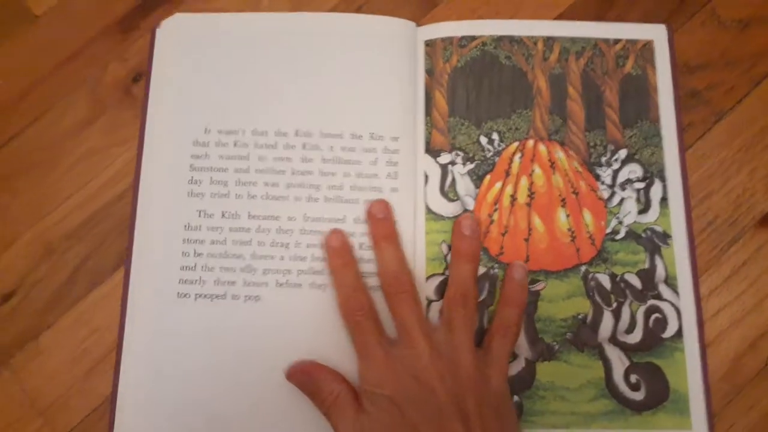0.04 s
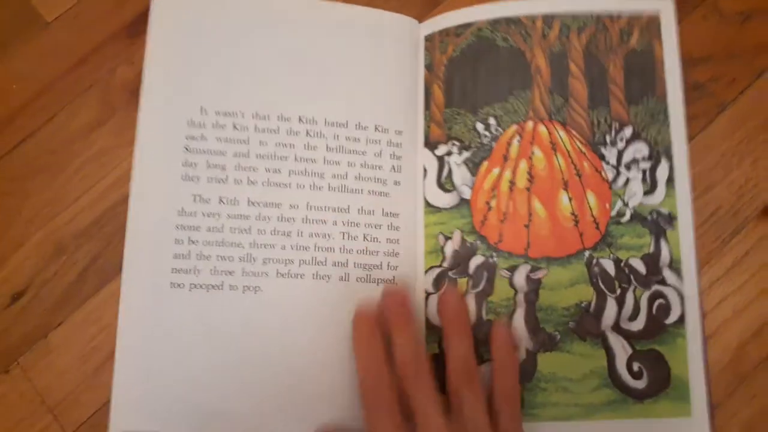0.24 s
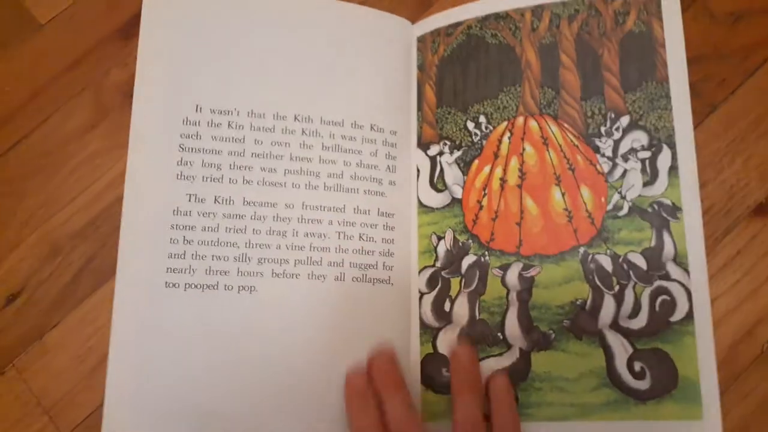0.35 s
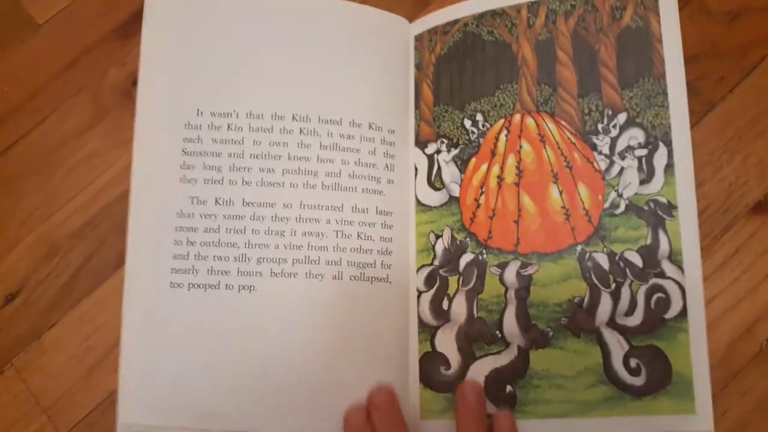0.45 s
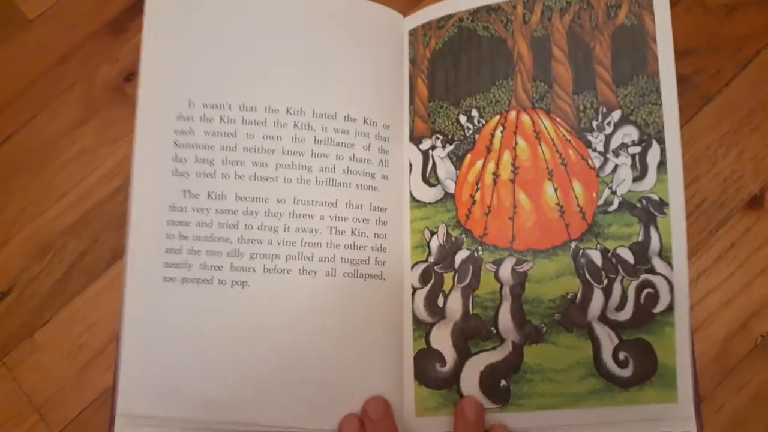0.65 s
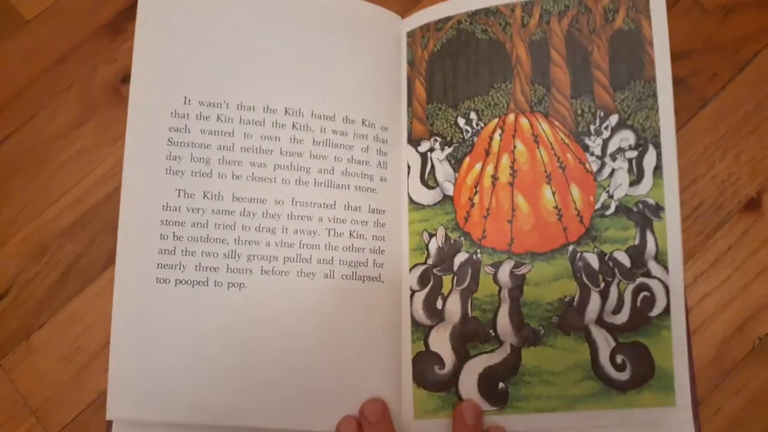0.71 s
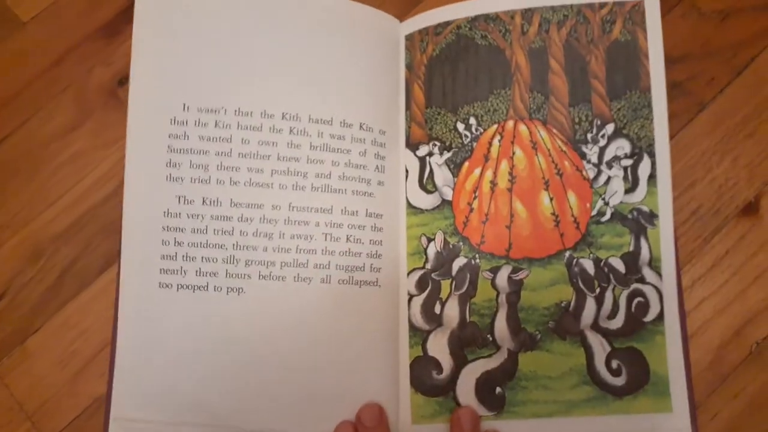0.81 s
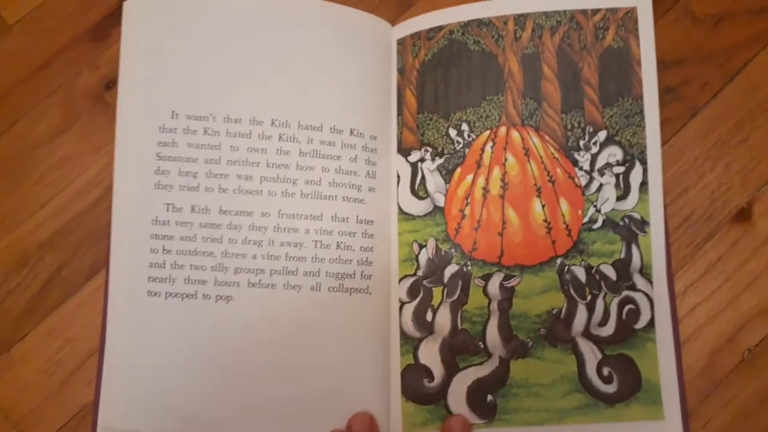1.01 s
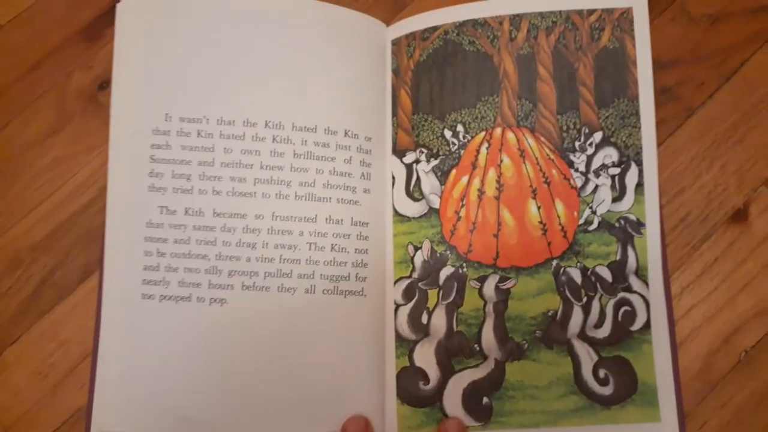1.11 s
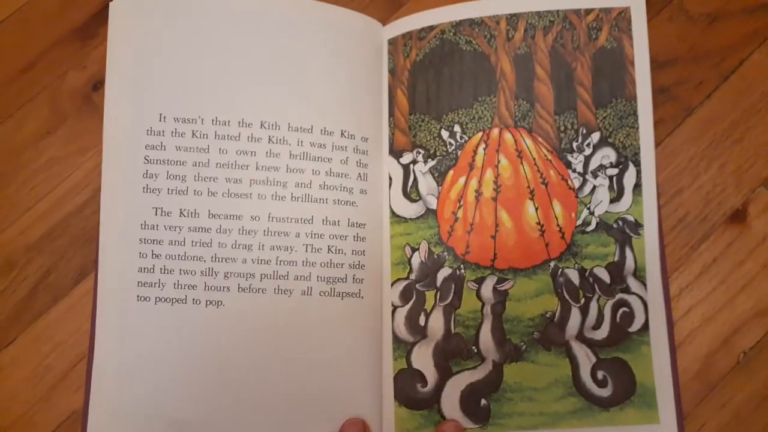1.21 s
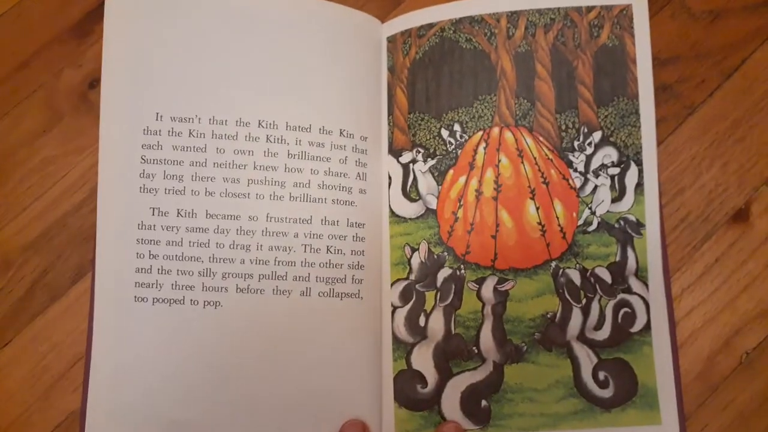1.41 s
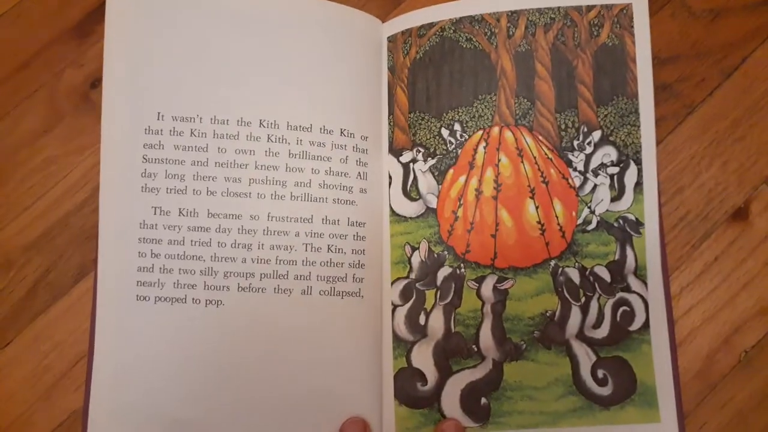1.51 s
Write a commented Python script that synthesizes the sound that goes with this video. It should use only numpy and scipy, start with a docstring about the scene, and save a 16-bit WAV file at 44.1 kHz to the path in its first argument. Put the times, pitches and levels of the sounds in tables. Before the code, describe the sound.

A hand slides down open book pages, close and right-sided: a soft rustle from the start, a dry hiss swelling to about 0.3 s and fading by 0.65. The book knocks on floorboards, hardest at 0.24 s with a papery clap, again near 0.32 and 0.37. Faint left ticks begin at 0.53; a soft low thud lands at 0.8. Steady machine hum and room hiss continue to about 1.5 s.

```python
"""A quiet room with a wooden floor: a machine hums as steady sines over room tone and microphone hiss.
Close to the right microphone a hand slides down the pages of an open book: dense clicks hiss and rustle.
From early on the book knocks on the boards, hardest near 0.24 s: struck modes ring, with a clap of pages.
From 0.53 s the binding ticks faintly on the left, short rings of small modes.
At 0.8 s comes a soft low thud, also nearer the left, made of low modes."""
import sys
import numpy as np
from scipy import signal
from scipy.fft import rfft, irfft
from scipy.io import wavfile

SR = 44100
rng = np.random.default_rng(int(sys.argv[2]) if len(sys.argv) > 2 else 0)


def int16_out(signal):
    """Quantize to a 16-bit WAV file."""
    q = np.round(np.clip(np.atleast_2d(signal).T, -1, 1) * 32767)
    wavfile.write(sys.argv[1], SR, q.astype(np.int16))


def how_loud(loudness_db):
    """Turn decibels into a plain amplitude multiplier (0 dB gives 1, 20 dB gives 10)."""
    steps = np.asarray(loudness_db, float) / 20
    return 10 ** steps


N = 68355  # length in samples

# Balance of the background between the microphones. Each row: frequency in Hz, left minus right in dB.
AIR_BALANCE = [(60, .6), (110, 0), (200, -5), (380, -5), (700, -4.5), (1290, -9), (2380, -2.5),
               (4400, -1.5), (15000, 0)]
# The book touches the boards. Each row: start in seconds, level in dB, cut of the soft contact in Hz,
# ring time under the hand as a multiple of the free ring time.
KNOCKS = [(.0560, -45, 2600, 0.51), (0.16, -43, 790, 1.2), (.1990, -40, 814, .5),
          (.2300, -22.5, 1500, 1.36), (0.2374, -14.5, 2500, 1.11), (0.2431, -32.5, 1270, 1),
          (0.2565, -42, 2000, 0.3), (0.3164, -24, 1800, .9), (.3203, -29, 1300, 0.37),
          (.3690, -35, 1260, 0.2), (0.3763, -42.5, 1280, 1), (0.678, -49.5, 905, 0.43)]
# How alike the hand's sound is at both microphones. Each row: frequency in Hz, likeness from 0 to 1.
SLIDE_LIKENESS = [(1200, 0.26), (4000, 0.067), (15000, 0.14)]


def rms_one(x):
    """Scale to rms 1."""
    return x / np.sqrt(np.mean(x ** 2) + 1e-20)


def at_hz(points, hz):
    """Read a table on a log-frequency axis."""
    table = np.array(points)
    return np.interp(np.log(hz), np.log(table[:, 0]), table[:, 1])


def drift(rate_hz):
    """Slow random wandering of spread 1: noise through two equal low-pass poles."""
    hop = 40  # samples between slow values
    pole = np.exp(-2 * np.pi * rate_hz * hop / SR)
    noise = rng.standard_normal(N // hop + 2002)
    slow = signal.lfilter([1], [1, -2 * pole, pole * pole], noise)[2000:]  # settled part
    return np.interp(np.arange(N) / hop, np.arange(len(slow)), rms_one(slow - slow.mean()))


def ring(clicks, hz, t60):
    """A two-pole resonator: a unit click sets a sine of height 1 ringing, down 60 dB after t60 s."""
    r = how_loud(-60 / (t60 * SR))
    w = 2 * np.pi * hz / SR
    return signal.lfilter([0, np.sin(w)], [1, -2 * r * np.cos(w), r * r], clicks + 1e-18)


def sides(balance_db):
    """Left and right gains around the middle, from left minus right in dB."""
    return how_loud(np.array([[.5], [-.5]]) * balance_db)


def coloured(source, spectrum, balance, likeness):
    """Mix two unrelated sources to a pair with given colour, balance and likeness; mid rms 1."""
    hz = np.maximum(np.fft.rfftfreq(N, 1 / SR), 1)
    inside = (hz >= spectrum[0][0]) & (hz <= spectrum[-1][0])
    mid, side = rfft(source)
    alike = np.clip(at_hz(likeness, hz), -1, 1)
    pair = np.sqrt(1 + alike) * mid + np.sqrt(1 - alike) * side * np.array([[1], [-1]])
    colour = how_loud(at_hz(spectrum, hz)) * inside
    out = irfft(pair * colour * sides(at_hz(balance, hz)), N)
    return out / np.sqrt(np.mean(out.mean(axis=0) ** 2))


def grains():
    """Two unrelated streams of dense uneven clicks."""
    grains_per_s, spread_db = 12000, 1.2
    present = rng.random((2, N)) < grains_per_s / SR
    heights = rng.standard_normal((2, N)) * how_loud(spread_db * rng.exponential(1, (2, N)))
    return present * heights


def strike(events, modes, spread_db):
    """Each event strikes every mode with a strength of its own; one row of sound per mode."""
    luck = rng.standard_normal((len(events), len(modes)))
    rows = np.zeros((len(modes), N))
    for (s, db, *contact), chances in zip(events, luck):
        start = int(s * SR)
        click = np.zeros(min(N - start, SR // 4))  # each ring is cut after a quarter second
        click[0] = how_loud(db)
        cut_hz, share = contact or (SR, 1)
        for row, (hz, level_db, t60, *_), chance in zip(rows, modes, chances):
            softness = 1 + (hz / cut_hz) ** 3  # a soft contact stirs high modes less
            gain = how_loud(level_db + spread_db * chance) / softness
            row[start:start + len(click)] += ring(click, hz, t60 * share) * gain
    return rows


def room_tone():
    """Room tone and microphone hiss: steady noise, most alike at both microphones in the bass."""
    # Colour of the background. Each row: frequency in Hz, level in dB per Hz (relative).
    air_colour = [(20, -36), (37, -17), (60, -28), (90, -9.5), (125, -8.5), (200, -16), (300, -8.5),
                  (390, -17.5), (520, -21.5), (640, -17), (1050, -20.5), (1300, -28), (1700, -33.5),
                  (2200, -35), (3000, -42.5), (4000, -42.5), (7000, -51), (9000, -52.5), (12000, -45),
                  (16000, -46.5)]
    # Each row: frequency in Hz, left-right likeness from 0 to 1.
    air_likeness = [(60, .9), (130, .85), (290, .8), (640, .55), (1410, .05), (15000, 0)]
    level_db = -61  # rms of the mid
    return how_loud(level_db) * coloured(rng.standard_normal((2, N)), air_colour, AIR_BALANCE, air_likeness)


def hum():
    """Steady machine tones: sines of constant level, each with a random phase."""
    # Tones of the machine. Each row: frequency in Hz, rms level in dB midway between the sides.
    hum_tones = [(61, -72), (86, -66), (103.4, -58), (207, -70), (276, -72), (317, -68), (414, -78),
                 (625, -80), (1017.5, -75)]
    t = np.arange(N) / SR
    total = np.zeros((2, N))
    for hz, db in hum_tones:
        tone = np.sqrt(2) * how_loud(db) * np.sin(2 * np.pi * (hz * t + rng.random()))
        total += tone * sides(at_hz(AIR_BALANCE, hz))
    return total


def room(x):
    """Dense reflections: noise that dies band by band, partly alike in both channels."""
    # Decay of the room. Each row: frequency in Hz, time to fall 60 dB in seconds.
    room_t60 = [(200, 1), (600, 0.2), (1200, 0.26), (3000, 0.3), (8000, 0.15)]
    gain_db, balance_db, delay_s = -12.5, -5.5, 0.003
    low_cut_hz, likeness = 450, .55
    t = np.arange(SR // 2) / SR
    tail = np.zeros((2, len(t)))
    limits_hz = 100 * 2 ** np.arange(0, 7.1, .5)  # half octaves
    for low, high in zip(limits_hz, limits_hz[1:]):
        sos = signal.butter(2, [low, high], "band", fs=SR, output="sos")
        band = signal.sosfilt(sos, rng.standard_normal((2, len(t))))
        tail += band * how_loud(-60 * t / at_hz(room_t60, np.sqrt(low * high)))
    mid, side = tail
    tail = np.sqrt(1 + likeness) * mid + np.sqrt(1 - likeness) * side * [[1], [-1]]
    tail = tail * (t > delay_s)
    tail = tail / np.sqrt(np.sum(tail ** 2, axis=1, keepdims=True) * .5)  # energy 2 in each channel
    high_pass = signal.butter(2, low_cut_hz, "high", fs=SR, output="sos")
    sent = signal.sosfilt(high_pass, x.mean(axis=0))
    return how_loud(gain_db) * sides(balance_db) * signal.fftconvolve(sent[None], tail, axes=1)[:, :N]


def thud():
    """A soft low thud nearer the left: a click rings a few low modes."""
    # Each row: start in seconds, level in dB.
    thud_events = [(.804, -42.5)]
    # Each row: frequency in Hz, level in dB, time to fall 60 dB in seconds.
    thud_modes = [(160, -3, .07), (230, -2, .06), (380, -8, .04)]
    right_db = -8
    left = strike(thud_events, thud_modes, 0.67).sum(axis=0)
    return np.array([left, how_loud(right_db) * left])


def binding_ticks():
    """Faint ticks of the binding on the left: clicks ring small, quickly dying modes."""
    # Each row: start in seconds, level in dB.
    tick_events = [(.528, -67), (.534, -72), (.541, -69), (.572, -71), (.674, -74), (.690, -74),
                   (.777, -88), (.879, -75), (1.186, -78), (1.202, -74), (1.288, -74), (1.304, -72),
                   (1.330, -74), (1.391, -74), (1.458, -73), (1.464, -72), (1.470, -74.5), (1.493, -73),
                   (1.498, -67.5), (1.526, -70), (1.531, -68), (1.547, -78)]
    # Each row: frequency in Hz, level in dB, time to fall 60 dB in seconds.
    tick_modes = [(2300, 6.5, 0.011), (3420, 8.5, 0.0041), (5660, -14, 0.0077)]
    right_db = -18
    left = strike(tick_events, tick_modes, 3.5).sum(axis=0)
    return np.array([left, how_loud(right_db) * left])


def floor_boards():
    """Each knock also sets the floor's low mode ringing, stronger at the right microphone."""
    # Each row: frequency in Hz, level in dB, free time to fall 60 dB in seconds.
    board_modes = [(187.7, -27.5, .2)]
    return strike(KNOCKS, board_modes, 1.0) * sides(-9.0)


def page_clap():
    """Pages clap with each knock: band-passed noise that dies exponentially, more for hard contacts."""
    level_db, t60_s, balance_db = -20, 0.083, -7.5
    low_hz, high_hz = 1360, 3270
    force = np.zeros(N)
    for s, db, cut_hz, _ in KNOCKS:
        force[int(s * SR)] = how_loud(db + level_db) * (cut_hz / low_hz) ** 2
    envelope = signal.lfilter([1], [1, -how_loud(-60 / (t60_s * SR))], force)
    sos = signal.butter(2, [low_hz, high_hz], "band", fs=SR, output="sos")
    return signal.sosfilt(sos, envelope * rng.standard_normal((2, N))) * sides(balance_db)


def book_knocks():
    """The book's edge meets the floor and modes ring; the left microphone hears it a little later."""
    # Modes of book and boards, ahead of the band filter. Each row: frequency in Hz, level in dB,
    # free time to fall 60 dB in seconds, left minus right in dB.
    book_modes = [(435, -14, .07, -1), (500, -18, .06, -2), (590, -21, .05, -3), (675, -16, .04, -4),
                  (780, -4, .04, -4), (850, -10, .03, -5), (950, -11, .04, -6), (1022, -3, .05, -8),
                  (1320, -13, .035, -8), (1450, -16, .035, -8), (1635, -11, .04, -8), (1875, -17, .035, -4),
                  (2090, -21, .03, -4), (2400, -22, .025, -3), (2700, -22, .025, -2)]
    left_lag_s = .0001
    balance_db = np.array(book_modes)[:, 3]
    left, right = sides(balance_db) @ strike(KNOCKS, book_modes, 1.5)
    left = np.interp(np.arange(N) - left_lag_s * SR, np.arange(N), left)
    sos = signal.butter(4, [540, 3200], "band", fs=SR, output="sos")  # Hz
    return signal.sosfilt(sos, [left, right])


def page_rustle():
    """Pages rustle below the hiss as the hand presses: coloured grains whose level also flickers."""
    # Press of the hand. Each row: time in seconds, level in dB.
    rustle_level = [(0, -69), (.03, -88), (.04, -66), (.065, -67), (.1, -66), (.15, -71.5), (.22, -71),
                    (.4, -74.5), (.5, -74), (.6, -86), (.67, -97), (.68, -76.5), (.75, -80), (1.2, -92),
                    (1.32, -85), (1.42, -88), (1.55, -84)]
    # Each row: frequency in Hz, level in dB per Hz (relative).
    rustle_colour = [(1200, 7.5), (2200, 5), (3200, -1), (4500, -14), (7000, -15.5)]
    # Each row: frequency in Hz, left minus right in dB.
    rustle_balance = [(1200, -14), (2400, -10.5), (7000, -12)]
    t = np.arange(N) / SR
    level_db = np.interp(t, *np.transpose(rustle_level)) + 1.5 * drift(27)
    return coloured(grains(), rustle_colour, rustle_balance, SLIDE_LIKENESS) * how_loud(level_db)


def hand_slide():
    """Skin catches on paper fibres: dense grains make a hiss that follows the hand's speed."""
    # Speed of the hand, as its hiss. Each row: time in seconds, level in dB.
    slide_level = [(0.0, -109), (0.012, -87), (0.092, -66), (0.138, -62.5), (0.23, -60.5), (0.238, -63.5),
                   (0.296, -57.5), (0.32, -57.5), (0.4, -65), (0.404, -62.5), (0.66, -92), (0.68, -80),
                   (0.8, -95)]
    # Each row: frequency in Hz, level in dB per Hz (relative).
    slide_colour = [(2500, 2), (4000, 10.5), (6000, 14), (7000, 5.5), (8500, 8), (11500, 10), (14000, -7),
                    (16000, 10)]
    # Each row: frequency in Hz, left minus right in dB.
    slide_balance = [(2500, -10), (4400, -12), (6000, -13), (8000, -25), (15000, -25)]
    t = np.arange(N) / SR
    level_db = np.interp(t, *np.transpose(slide_level), right=-120)  # next to nothing after the last row
    return coloured(grains(), slide_colour, slide_balance, SLIDE_LIKENESS) * how_loud(level_db)


def scene():
    """Book and hand close by, over hum and room tone; the room answers knocks, ticks and thud."""
    blows = book_knocks() + page_clap() + floor_boards() + binding_ticks() + thud()
    hand = hand_slide() + page_rustle()
    return blows + room(blows) + hand + hum() + room_tone()


def top_cut(x):
    """Nothing passes above the cut-off."""
    return signal.sosfilt(signal.butter(12, 16020, fs=SR, output="sos"), x)


def record(dry):
    """The finished mix as it is stored."""
    return top_cut(dry)


dry = scene()
out = record(dry)
int16_out(out)
```